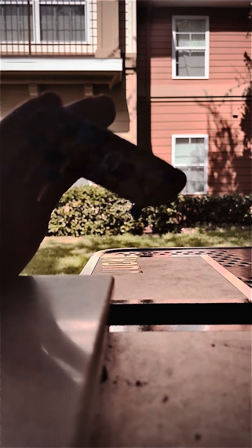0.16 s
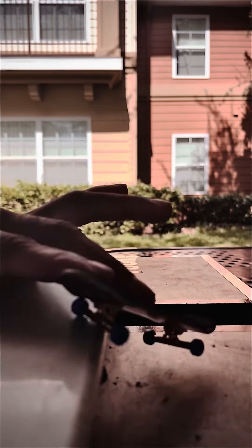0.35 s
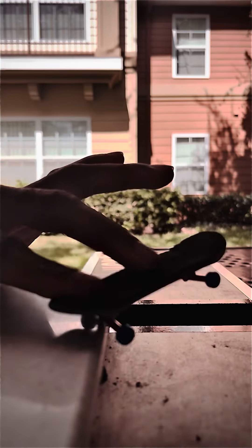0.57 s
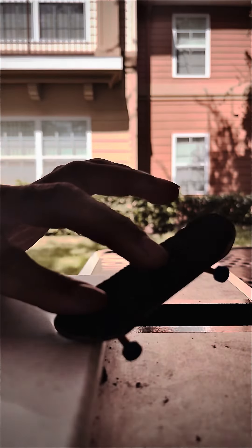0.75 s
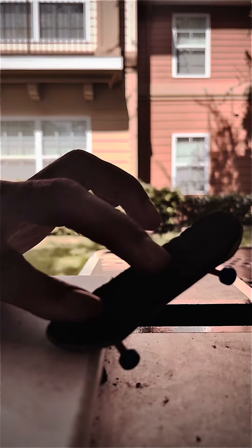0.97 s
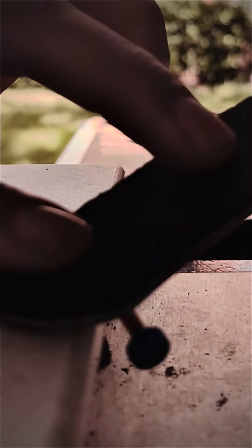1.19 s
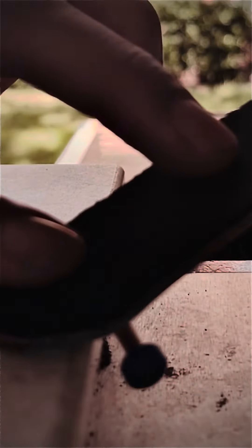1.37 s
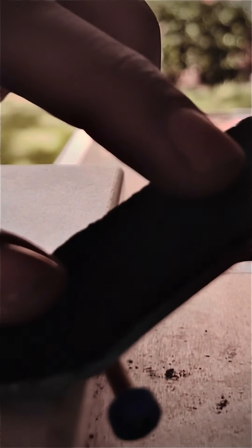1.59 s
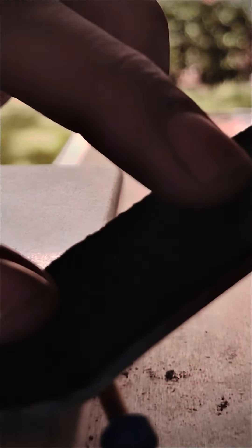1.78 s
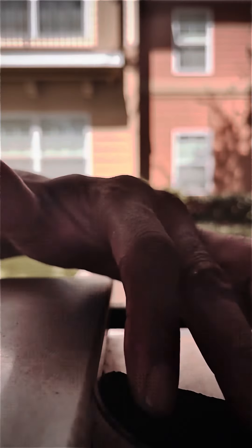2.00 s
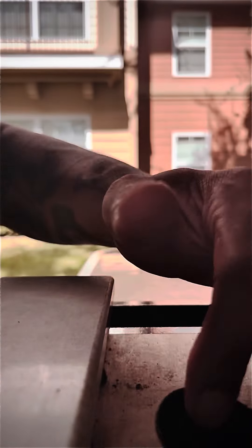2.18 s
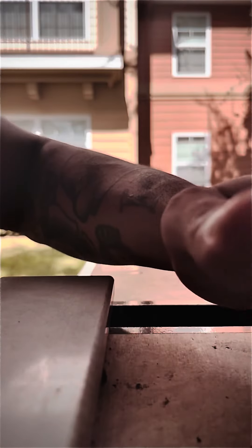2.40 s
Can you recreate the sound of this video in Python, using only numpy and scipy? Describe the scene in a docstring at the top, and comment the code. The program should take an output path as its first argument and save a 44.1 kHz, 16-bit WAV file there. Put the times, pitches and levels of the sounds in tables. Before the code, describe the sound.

A toy finger skateboard hits a hard table at 0.23 seconds: a dense, slowed, woody clatter with rattling until 0.4 and a low table wobble. A single lighter tick comes at 0.65. Soft patchy outdoor hiss and rumble continue, with a very faint distant bird chirp near 1.0. At 1.95-2.05 brisk, brighter full-speed knocks crowd together, then faint sliding to the end. Close stereo phone pickup, slight outdoor reflections.

```python
"""Soft, slightly patchy outdoor hiss and low rumble, then a toy skateboard lands, rattles and knocks on a table.
A phone with two microphone ports lies close by; a single faint bird chirp comes from far away.
Most of it plays in slow motion at half speed, which halves every pitch; the last knocks run at full speed.
Knocks and slides are clicks ringing one modelled body of deck and table; shakes and bird are sines.
The air is shaped random spectra, and dying noise throws the knocks and slides back from walls and ground."""
import sys
import numpy as np
from scipy import signal
from scipy.fft import rfft, irfft
from scipy.io import wavfile
from scipy.ndimage import uniform_filter1d

SR = 44100
rng = np.random.default_rng(int(sys.argv[2]) if len(sys.argv) > 2 else 0)


def waveform_to_disk(signal):
    """Save audio, clipped to [-1, 1], as 16-bit WAV at the path in sys.argv[1]."""
    frames = np.transpose(np.atleast_2d(signal))
    scaled = np.clip(frames, -1, 1) * 32767
    samples = np.round(scaled).astype(np.int16)
    wavfile.write(sys.argv[1], SR, samples)


N = 108045

FULL_SPEED_S = 1.966  # slow motion ends here
# "slow" marks pitches and times as heard at half speed: speed 2 doubles such pitches and halves such times
THUD_TOP_SLOW_HZ = 392  # rings and crack below this are the thud
AIR_TOP_HZ, NEAR_TOP_HZ = 13600, 15700  # at full speed air and echoes lose their treble below the knocks


def amp(db):
    """Decibels to amplitude factor."""
    return 10 ** (np.asarray(db) / 20)


def evened(x):
    """Scale to an rms of one."""
    return x / np.sqrt(np.mean(x ** 2) + 1e-20)


def read(points, hz, column=1):
    """Read a table along a logarithmic pitch axis."""
    table = np.array(points)
    return np.interp(np.log(hz + 1), np.log(table[:, 0] + 1), table[:, column])


def curve(points, t, column=1):
    """Read a table along time."""
    table = np.array(points)
    return np.interp(t, table[:, 0], table[:, column])


def add(mix, s, sound):
    """Lay a sound into the mix from s seconds on, cut at the end of the scene."""
    part = mix[..., round(s * SR):][..., :sound.shape[-1]]
    part += sound[..., :part.shape[-1]]


def speed_at(s):
    """1 in slow motion, 2 at full speed."""
    return 1 if s < FULL_SPEED_S else 2


def air(speed):
    """Outdoor air: random spectra, equally uneven in bass and treble; two unrelated draws."""
    # spectrum of the air: slow_hz, relative level_db per Hz
    air_colour = [(12, -41), (22, -8.5), (33, -0.5), (49, -1), (81, -8), (120, -9.5), (180, -11.5),
                  (250, -23), (700, -24.5), (1200, -31), (2500, -34.5), (4500, -41.5), (7000, -45.5),
                  (8800, -53), (9500, -66), (10200, -92)]
    # loudness of the air before the ports: time_s, level_db
    air_loudness = [(0, -42.5), (.6, -42.5), (.9, -42), (1.3, -42), (1.9, -42.5), (1.97, -43),
                    (2.15, -44.5), (2.45, -42.5)]
    # shift of the treble, growing from 1 to 2 kHz (slow) and full above: time_s, shift_db
    treble_shift = [(0, -12), (.2, -5), (.5, -1.5), (.75, -6), (1.9, -0.5), (2.1, 14), (2.2, -1.5),
                    (2.45, -5.5)]
    patch_db = 2.5  # rms unevenness over pitch and time
    fast_tilt_db = -1.5  # per octave above 2 kHz, times (speed - 1)

    frames, hz = N // 512 + 5, np.fft.rfftfreq(2048, 1 / SR)
    a, b, c, d, patches = rng.standard_normal((frames, 1025, 5)).T
    patches = uniform_filter1d(patches, size=16, axis=0)  # smooth over pitch
    patches = evened(uniform_filter1d(patches, size=5, axis=1))  # smooth over time

    treble_share = np.clip(np.log2(hz / speed / 1000 + 1e-3), 0, 1)[:, None]
    treble_db = treble_share * curve(treble_shift, np.arange(frames) * 512 / SR)
    treble_db = treble_db + (speed - 1) * fast_tilt_db * np.log2(np.maximum(hz / 2000, 1))[:, None]

    colour_db = read(air_colour, hz / speed)[:, None]
    spectra = np.array([a + 1j * b, c + 1j * d]) * amp(colour_db + patch_db * patches + treble_db)
    noise = signal.istft(spectra, nperseg=2048, noverlap=1536)[1][:, :N]
    return amp(curve(air_loudness, np.arange(N) / SR)) * evened(noise)


def body(speed, favoured_hz, tilt_db, ring_db, thud_db):
    """Answer of deck and table to one click: a bare crack plus the rings, two spots for the two ports."""
    # resonances of deck and table top: slow_hz, relative level_db, slow_t60_s
    deck_rings = [(179, -10.5, 0.074), (297, -1.5, .05), (460, 2, 0.04), (634, -2.5, 0.035),
                  (908, -2.5, 0.024), (1123, -6.5, 0.053), (1463, -3, 0.016), (1920, 2.5, 0.0083),
                  (2390, -3, 0.017), (3370, 1.5, 0.007), (4150, -5.5, 0.013), (6040, -30, .01),
                  (8000, -29.5, .009)]
    # spectrum of the bare crack: slow_hz, relative level_db
    crack_colour = [(100, -1.5), (400, 7), (1000, 5.5), (2500, 3), (5000, -3.5), (8500, -17), (9600, -29),
                    (10500, -43)]
    favour_db = 18  # loss per octave away from the favoured pitch

    t, hz = np.arange(4096) / SR, np.fft.rfftfreq(4096, 1 / SR)
    # the thud share is full below its top and gone half an octave above
    thud_share = np.clip(2 * np.log2(np.sqrt(2) * THUD_TOP_SLOW_HZ * speed / (hz + 1)), 0, 1)
    bright_db = tilt_db * np.log2(hz / speed / 2000 + 0.023)
    log_gain = np.log(amp(read(crack_colour, hz / speed) + bright_db + thud_db * thud_share))
    # minimum phase: the crack starts at once
    full = np.r_[log_gain, log_gain[-2:0:-1]]
    crack = np.fft.ifft(np.exp(full - 1j * signal.hilbert(full).imag)).real

    f, db, t60 = np.array(deck_rings).T[:, :, None]
    above_thud_db = ring_db - favour_db * abs(np.log2(f / favoured_hz))
    share_db = np.where(f < THUD_TOP_SLOW_HZ, thud_db, above_thud_db)
    size = amp(db + share_db - 60 * t * speed / t60) * np.sqrt(speed / t60 / SR) * 6
    onset = 1 - np.exp(-2 * f * speed * t)
    start_phase = rng.random((2, len(deck_rings), 1))  # in turns
    rings = (size * onset * np.sin(2 * np.pi * (f * speed * t + start_phase))).sum(1)
    return rings + crack / np.linalg.norm(crack)


def knock(s, level_db, favoured_hz, tilt_db, swell, chatter, ring_db, thud_db):
    """A blow is a quick chatter of contacts that swells and dies; each contact rings the body."""
    main_contact = 3.6  # size of the main contact among the chatter, before squaring
    speed, swell = speed_at(s), max(swell, 1e-4)
    t = np.arange(-.02, .06, 1 / SR)
    dying = amp(-60 * np.maximum(t, 0) * speed / chatter)
    shape = np.where(t < 0, np.exp(np.minimum(t, 0) / swell), dying)
    contacts = rng.standard_normal((2, len(t)))
    contacts[:, np.argmax(shape)] = main_contact
    clicks = contacts * abs(contacts) * shape  # signed squares: a few contacts stand out
    sound = signal.fftconvolve(clicks, body(speed, favoured_hz, tilt_db, ring_db, thud_db), axes=1)
    # loudest rms over 2 ms, each port by itself
    loudest = np.sqrt(np.max(uniform_filter1d(sound ** 2, size=88), axis=1, keepdims=True))
    return s - .02, amp(level_db) * .5 * sound / loudest


def yard(x, speed):
    """Dull dying noise: walls and ground throw the near sounds back."""
    level_db, slow_t60_s, slow_rise_s, dull_slow_hz = -26.5, 0.67, 0.016, 4000
    t = np.arange(SR // 2) / SR
    fade = amp(-60 * t * speed / slow_t60_s) * np.minimum(t * speed / slow_rise_s, 1)
    tail = rng.standard_normal((2, len(t))) * fade
    tail = signal.lfilter(*signal.butter(1, dull_slow_hz * speed, fs=SR), tail)
    return amp(level_db) * signal.fftconvolve(x, tail / np.linalg.norm(tail[0]), axes=1)[:, :N]


def slide(favoured_hz, tilt_db, ring_db, points):
    """Deck sliding and rattling: dense small clicks of uneven size into the same body."""
    grains_per_slow_s, grain_spread_db, thud_db = 2000, 1, -5
    t = np.arange(points[0][0], points[-1][0], 1 / SR)
    speed = speed_at(t.mean())
    sizes = amp(grain_spread_db * np.minimum(rng.exponential(1, (2, len(t))), 4))
    clicks = sizes * rng.choice([-1, 1], (2, len(t)))
    clicks = clicks * (rng.random((2, len(t))) < grains_per_slow_s * speed / SR)
    sound = signal.fftconvolve(clicks, body(speed, favoured_hz, tilt_db, ring_db, thud_db), axes=1)
    sound = evened(sound[:, :len(t)])
    return t[0], amp(curve(points, t)) * signal.windows.tukey(len(t), .1) * sound


def shake(s, level_db, hz, rise, t60):
    """A low wobble or hum of the table frame: a sine that builds up and dies."""
    t = np.arange(0, .5, 1 / SR)
    build = np.sin(np.pi / 2 * np.minimum(t / rise, 1)) ** 2
    return s, build * amp(level_db - 60 * t / t60) * np.sin(2 * np.pi * hz * t)


def bird():
    """One thin whistle far away: a sine whose pitch mostly falls."""
    # path of the chirp as heard: time_s, pitch_hz, level_db before the ports
    chirp_path = [(.978, 4030, -78), (.995, 3900, -65.5), (1.012, 3680, -66), (1.025, 3410, -66),
                  (1.045, 3430, -62), (1.06, 3230, -81)]
    t = np.arange(chirp_path[0][0], chirp_path[-1][0], 1 / SR)
    turns = np.cumsum(curve(chirp_path, t)) / SR
    return t[0], amp(curve(chirp_path, t, column=2)) * np.sin(2 * np.pi * turns)


def ports(pair, speed, top_hz, column):
    """The right port gets part of the left's sound, later and phase-turned, and part of its own."""
    # the two ports: slow_hz, extra phase of left_rad, left minus right_db,
    # likeness of near sounds (0 to 1), likeness of the air (0 to 1)
    port_pair = [(30, -.45, 0, .97, .97), (90, -.7, 0, .94, .96), (200, -1.3, 1, .75, .8),
                 (350, -2.2, 4, .65, .15), (800, -2.6, 1, .75, .75), (1200, -2.6, -4, .4, .45),
                 (1750, -3.4, -5, .7, .7), (2150, -5, -5, .6, .3), (2600, -6.4, -1, .9, .7),
                 (3000, -5.7, 0, .9, .9), (6000, -5.9, 0, .95, .97), (9000, -6.6, 0, .92, .97)]
    lead_slow_s = 0.0004783  # the left port hears first
    edge_slow_hz, edge_fall_db = 9750, 4  # treble end of the microphone; fall per slow Hz
    top_fall_db = 3  # per Hz as heard

    hz = np.fft.rfftfreq(N, 1 / SR) / speed
    edge_db = -edge_fall_db * np.maximum(hz - edge_slow_hz, 0)
    top_db = -top_fall_db * np.maximum(hz * speed - top_hz, 0)
    a, b = rfft(pair) * amp(edge_db + top_db)
    same = np.clip(read(port_pair, hz, column), 0, 1)
    # half of the level and phase difference goes to each port
    phase = 2 * np.pi * hz * lead_slow_s + read(port_pair, hz)
    turn = amp(read(port_pair, hz, column=2) / 2) * np.exp(.5j * phase)
    right = same * a + np.sqrt(1 - same ** 2) * b
    return irfft(np.array([a * turn, right / turn]), N)


def scene():
    """Near and far sounds at both speeds, each heard through the two ports."""
    # knocks: peak_s, level_db (2 ms rms against half of full scale, before the ports), favoured pitch slow_hz,
    # brightness_db per octave, swell before the peak_s, chatter slow_t60_s, ring_db, low thud_db
    knock_rows = [(0.223, -29, 1800, -10.5, 0.0022, 0.026, -4.5, -9.5),
                  (0.2293, -6.5, 1460, 6, 0.00027, 0.028, 0.5, -12),
                  (0.2329, -9.5, 1910, -3, 0.00046, 0.043, -17, -7),
                  (0.247, -6.5, 1053, 7.5, 0.00089, 0.018, 0, -7.5),
                  (.251, -6, 1480, 0, 0.00022, 0.011, -3.5, -11.5),
                  (0.2678, -32, 4200, 12.5, .001, 0.013, -1.5, -15.5),
                  (.275, -21.5, 630, -4, 0.00058, 0.0069, 1.5, -14.5),
                  (.289, -27.5, 640, -5, 0.0012, .015, 6.5, -16),
                  (0.3042, -19, 880, -14, .0002, 0.0022, 11, -23.5),
                  (0.3364, -27, 1060, -3, 0.0024, 0.042, 8.5, -14),
                  (0.3547, -23.5, 660, -6.5, 0.00028, 0.013, 3, -18.5),
                  (0.6524, -15.5, 2500, 1.5, 0.00032, 0.016, 4.5, -17),
                  (0.674, -36.5, 2480, 0.5, .001, 0.017, -3, -11),
                  (1.9499, -19.5, 910, 1.5, 0.002, 0.19, 3.5, -7),
                  (1.9647, -20.5, 5000, 9.5, 0.00082, 0.015, 4, -20),
                  (1.9698, -7.5, 1200, 6, 0.00049, 0.012, 8.5, -27),
                  (1.976, -29, 1100, 0, .0005, 0.011, 13.5, -16),
                  (1.991, -22.5, 2400, -10, 0.0011, 0.063, 10.5, -14.5),
                  (2., -4.5, 2120, 5, 0.0015, 0.007, 6.5, -5.5),
                  (2.006, -20, 1910, -3.5, 0.00088, 0.015, -5, -8),
                  (2.03, -27, 1930, 6.5, 0.00092, 0.018, -12, 1),
                  (2.035, -14.5, 1400, -0.5, 0.002, 0.023, 5, -17),
                  (2.0381, -7, 2030, 4, 0.00072, 0.027, -1.5, -8.5),
                  (2.041, -9.5, 2400, 1, 0.00033, 0.0045, 8.5, -0.5),
                  (2.051, -32, 1930, 9, 0.00071, 0.018, 1, 7),
                  (1.838, -39, 1700, -7, 0.00038, 0.04, -1.5, -24.5),
                  (2.167, -46, 1563, -5, 0.0011, 0.054, 1.5, -21.5),
                  (2.218, -47, 1340, -6.5, .001, 0.025, 1.5, -20),
                  (2.29, -44.5, 1470, -23, 0.00063, .02, 3.5, -24)]
    # slides: favoured pitch slow_hz, brightness_db per octave, ring_db, path of (time_s, level_db before the ports)
    slide_rows = [(780, 0, 2, [(.255, -45), (.275, -36), (.30, -35), (.322, -41), (.335, -35.5),
                  (.365, -37.5), (.39, -47.5), (.5, -65)]), (1940, -3.5, 1, [(1.81, -60), (1.84, -50.5),
                  (1.885, -62.5), (1.9, -81), (1.935, -76), (1.96, -34)]), (1930, -1, -2.5, [(1.97, -35),
                  (1.985, -49), (2.01, -35.5), (2.03, -32), (2.05, -35.5), (2.075, -45), (2.13, -66)]),
                  (1520, -11, 6, [(2.14, -72.5), (2.17, -45), (2.225, -56), (2.25, -60.5), (2.38, -62),
                  (2.405, -56.5), (2.44, -57)]), (450, -10, 7.5, [(2.15, -55), (2.17, -60), (2.2, -55.5),
                  (2.26, -53.5), (2.31, -55.5), (2.38, -54.5), (2.42, -59)])]
    # table shakes as heard: start_s, level_db before the ports, pitch_hz, rise_s, t60_s
    shake_rows = [(0.263, -21, 53, 0.027, 0.26), (.41, -23.5, 46, 0.017, 0.17),
                  (.475, -25, 44.4, 0.017, 0.29), (1.19, -30.5, 55, 0.025, 0.14),
                  (1.331, -41, 39.2, 0.02, 0.17), (1.998, -29.5, 347.7, 0.0023, 0.21),
                  (2.037, -32, 350.7, 0.0035, 0.17), (2.038, -32, 442, 0.0029, .15),
                  (2.042, -27.5, 91.6, 0.018, 0.2), (2.081, -34.5, 71.6, 0.028, 0.76),
                  (2.386, -34.5, 78.4, 0.019, 0.14)]

    near, far = np.zeros((2, 2, N)), np.array([air(1), air(2.08)])  # speed, port, sample
    for s, sound in [knock(*row) for row in knock_rows] + [slide(*row) for row in slide_rows]:
        add(near[speed_at(s + .02) - 1], s, sound)
    for s, sound in [shake(*row) for row in shake_rows] + [bird()]:
        add(far[speed_at(s) - 1, 0], s, sound)

    # the far sounds cross over to full speed within 20.5 ms
    fast = np.clip((np.arange(N) / SR - FULL_SPEED_S) / 0.0205, 0, 1)
    out = ports(far[0], 1, AIR_TOP_HZ, column=4) * np.sqrt(1 - fast)
    out = out + ports(far[1], 2.02, AIR_TOP_HZ, column=4) * np.sqrt(fast)
    for speed in (1, 2):
        direct = near[speed - 1]
        out = out + ports(direct, speed, NEAR_TOP_HZ, column=3)
        out = out + ports(yard(direct, speed), speed, AIR_TOP_HZ, column=3)
    return out


def record(dry):
    """The loudest peaks are rounded off; then the band limit."""
    headroom, edge_hz = 3.0, 16600  # headroom in units of full scale
    held = headroom * np.tanh(dry / headroom)
    low_pass = signal.firwin(1023, edge_hz, window=("kaiser", 12), fs=SR)
    return signal.oaconvolve(held, low_pass[None], "same")


dry = scene()
out = record(dry)
waveform_to_disk(out)
```